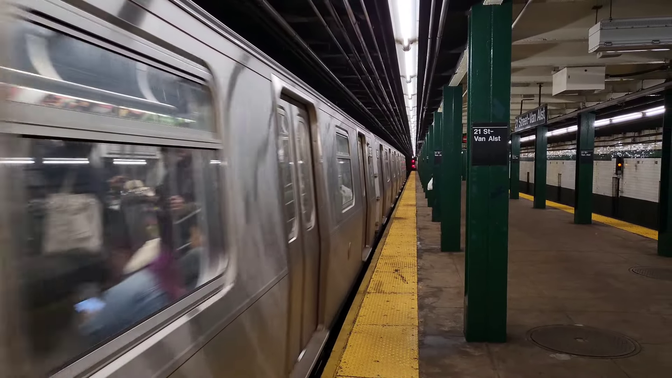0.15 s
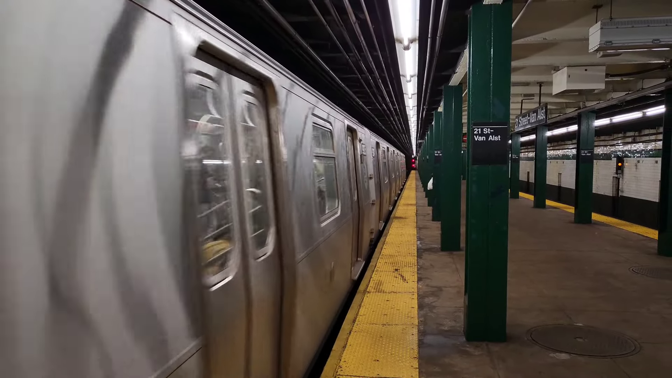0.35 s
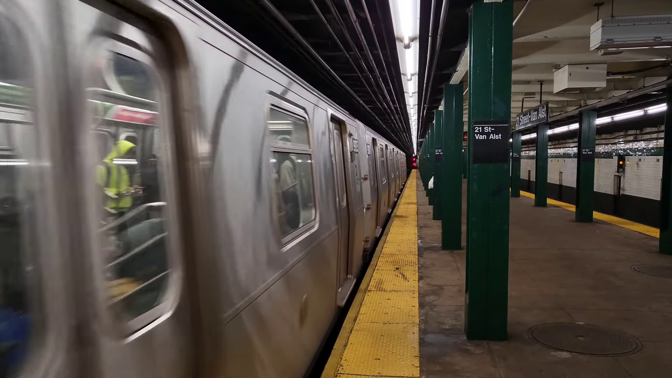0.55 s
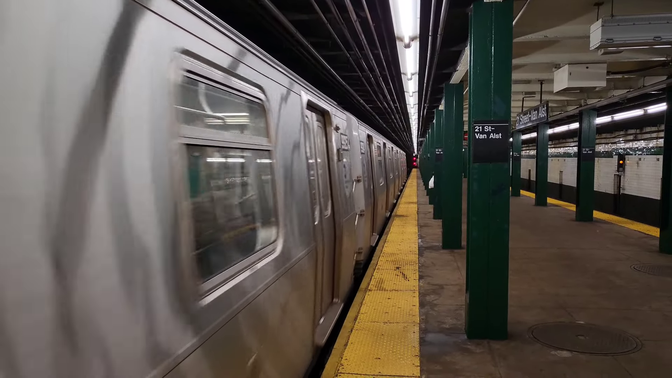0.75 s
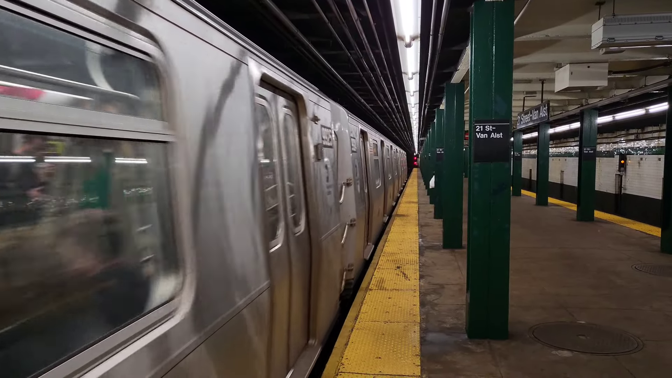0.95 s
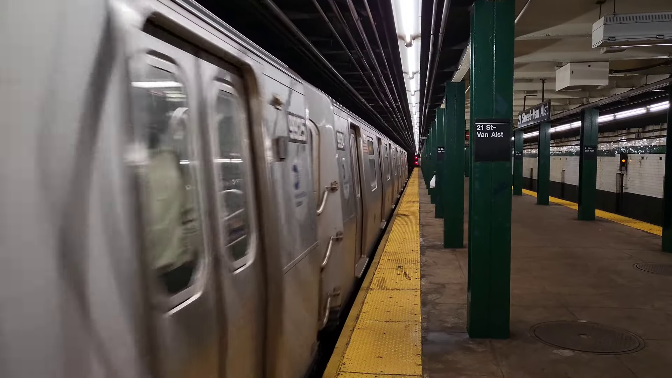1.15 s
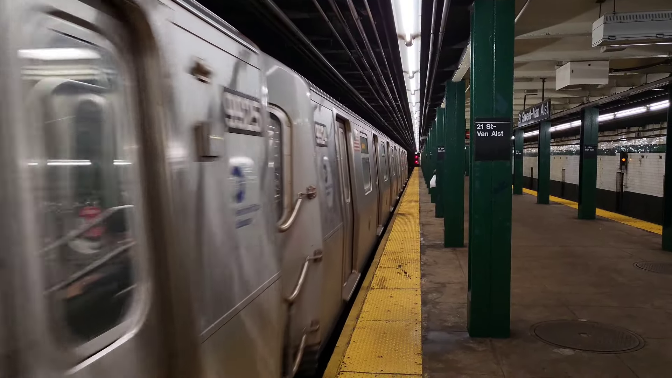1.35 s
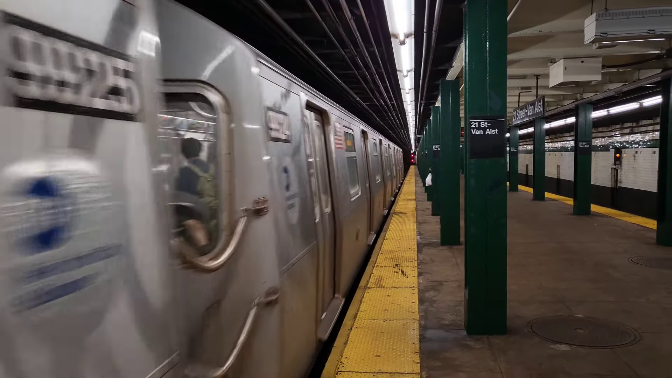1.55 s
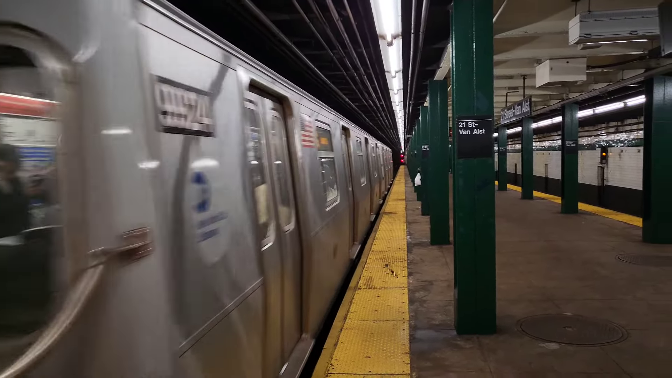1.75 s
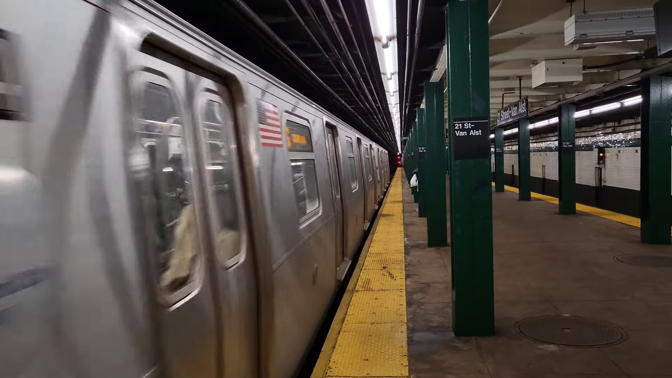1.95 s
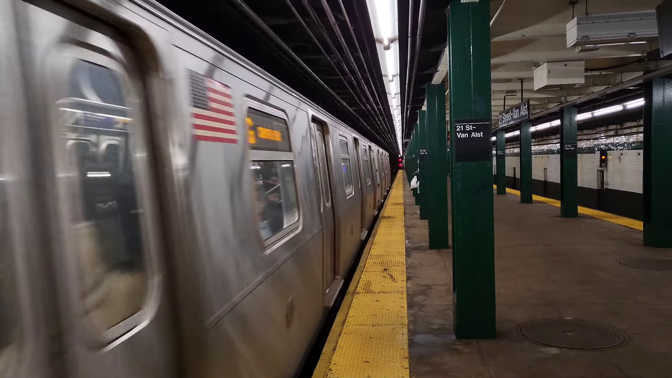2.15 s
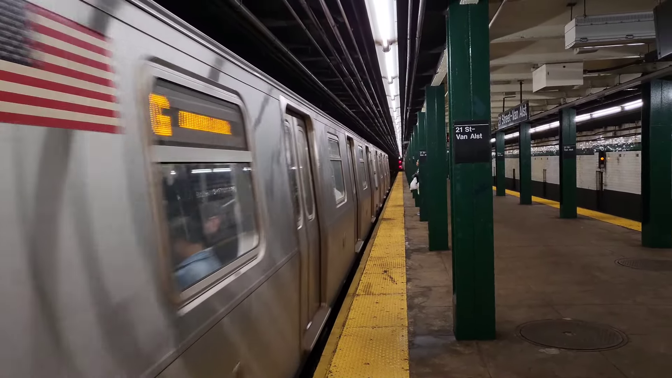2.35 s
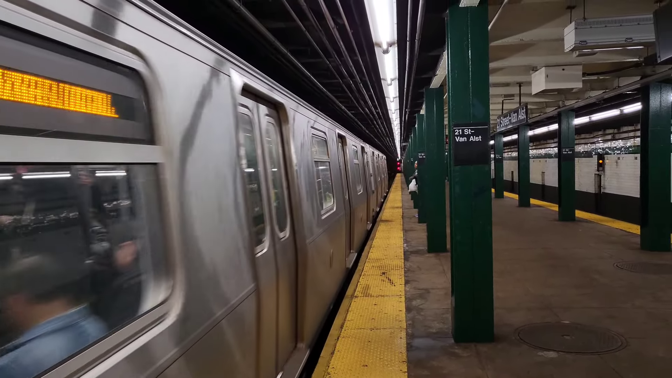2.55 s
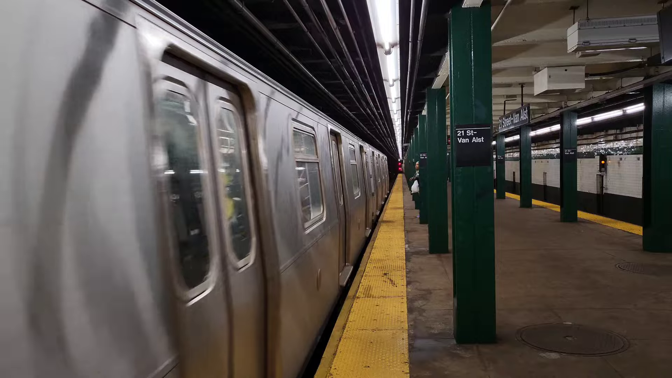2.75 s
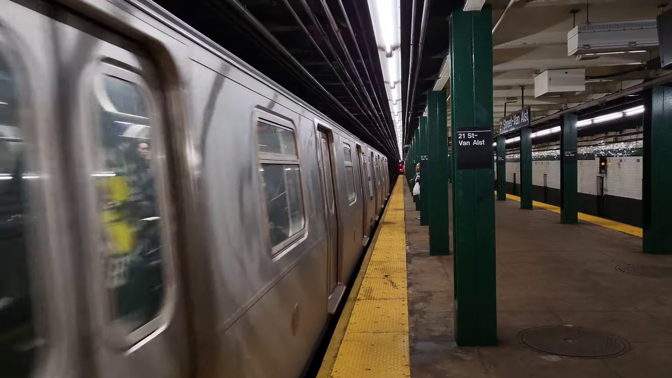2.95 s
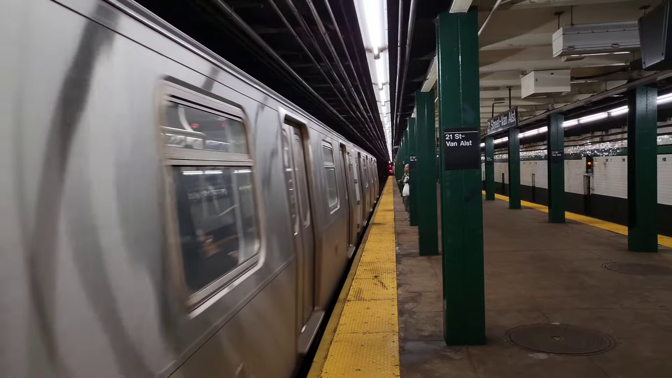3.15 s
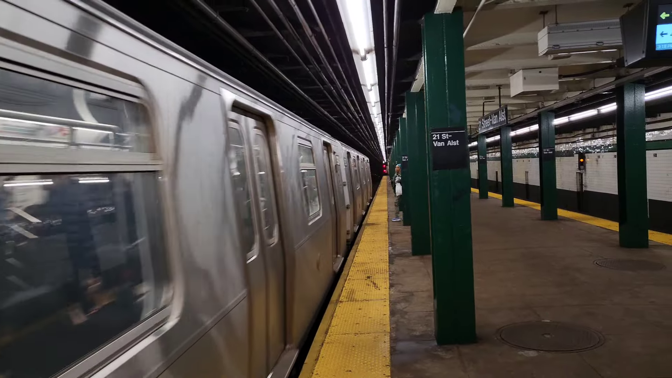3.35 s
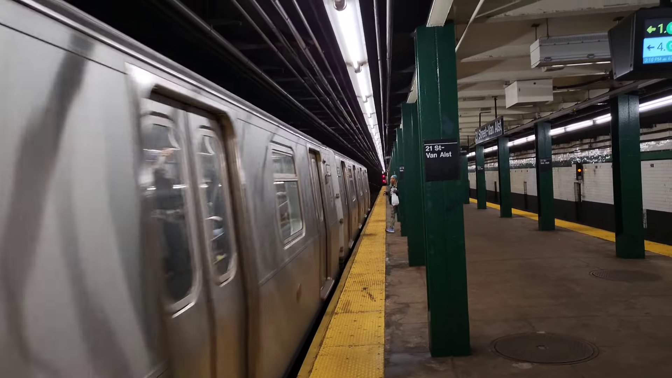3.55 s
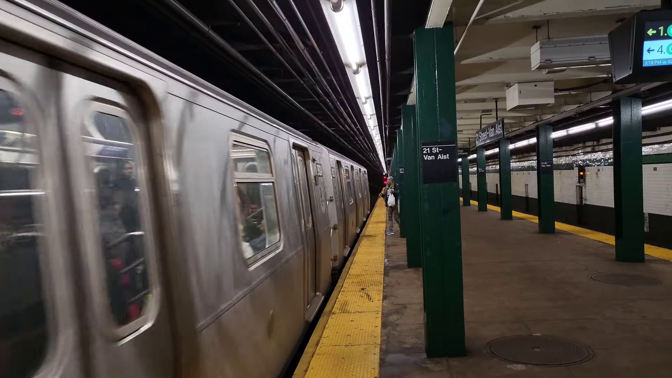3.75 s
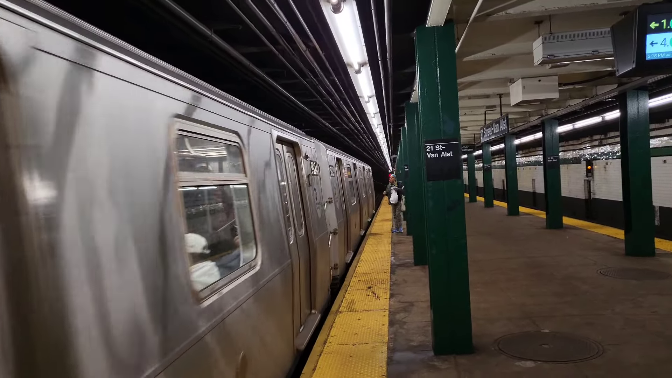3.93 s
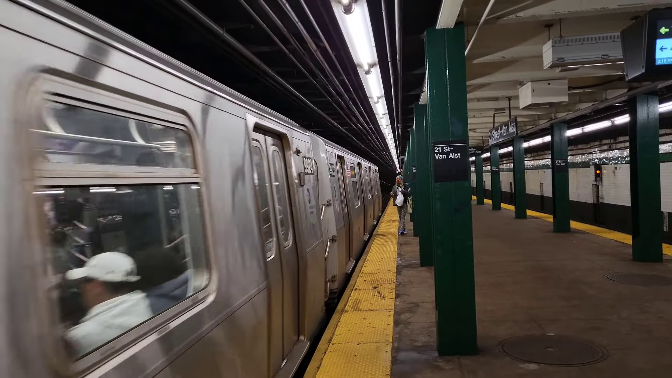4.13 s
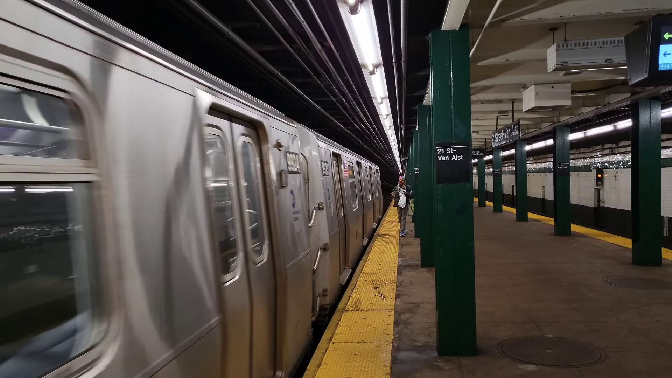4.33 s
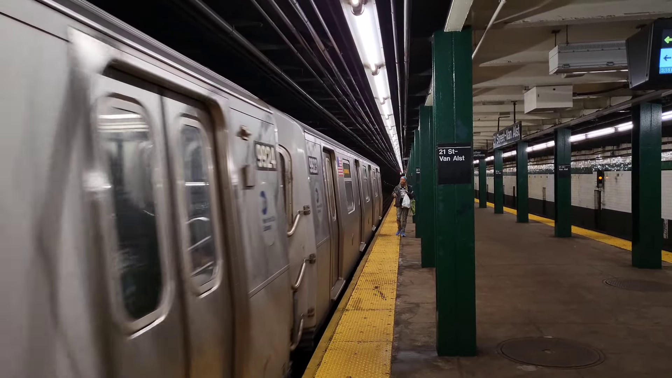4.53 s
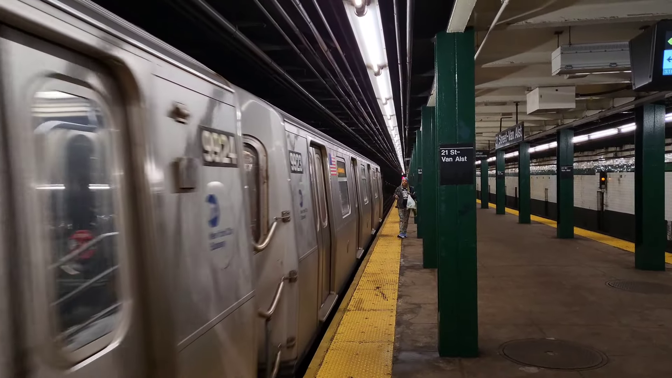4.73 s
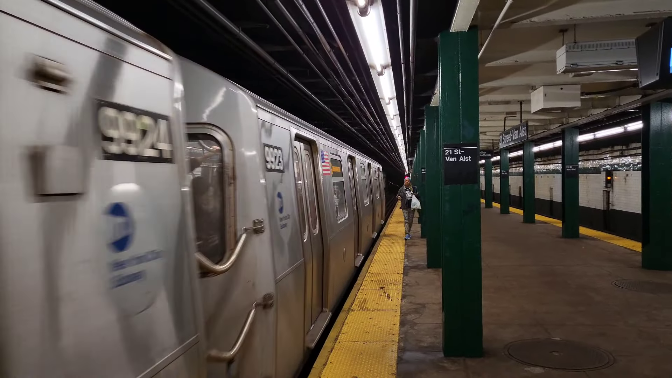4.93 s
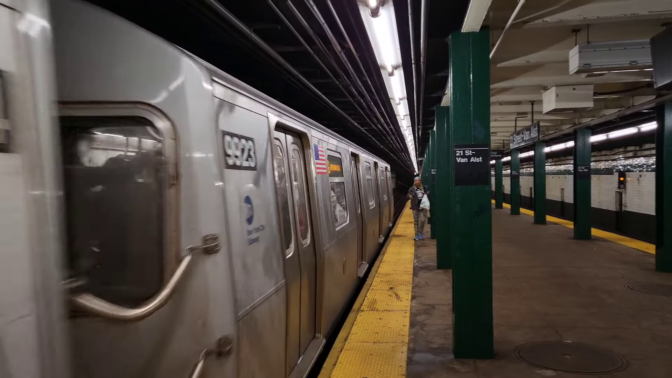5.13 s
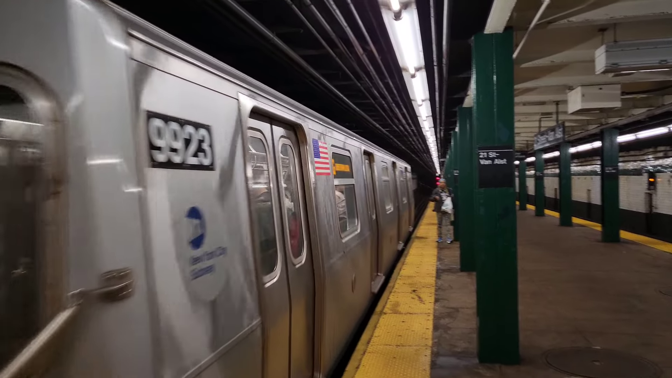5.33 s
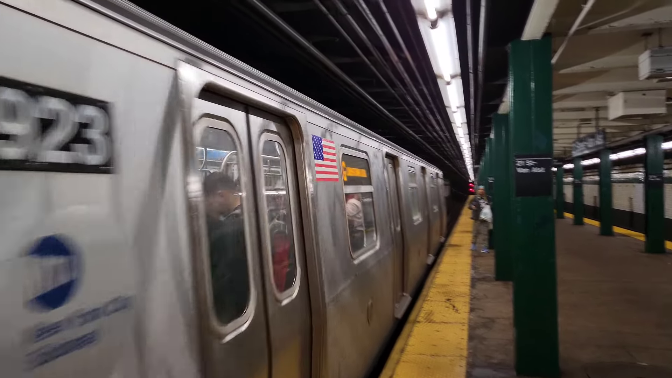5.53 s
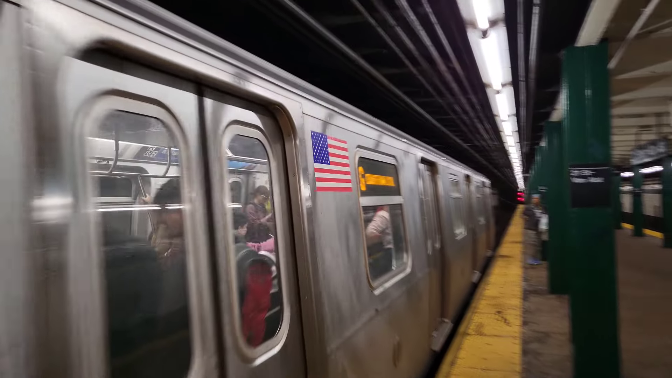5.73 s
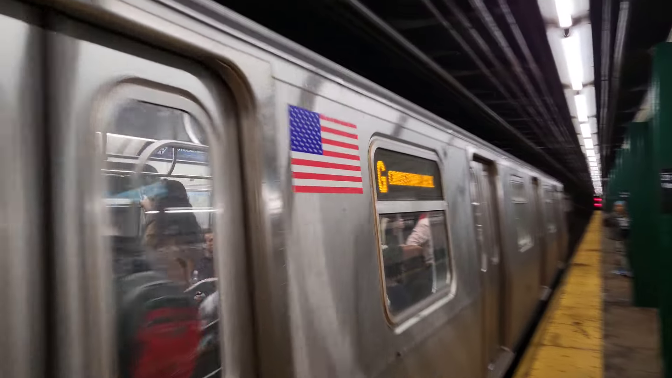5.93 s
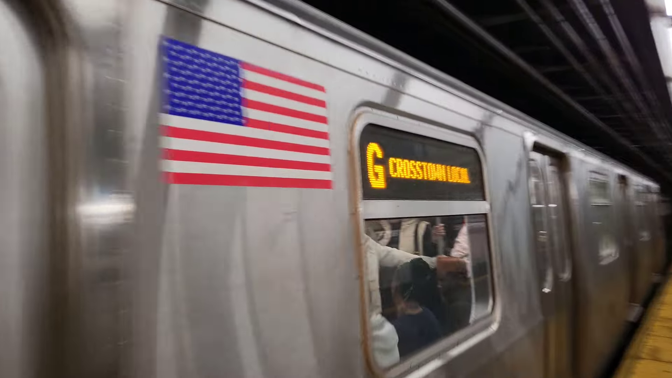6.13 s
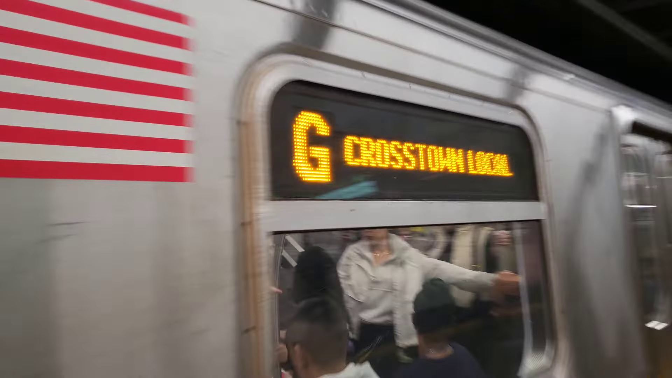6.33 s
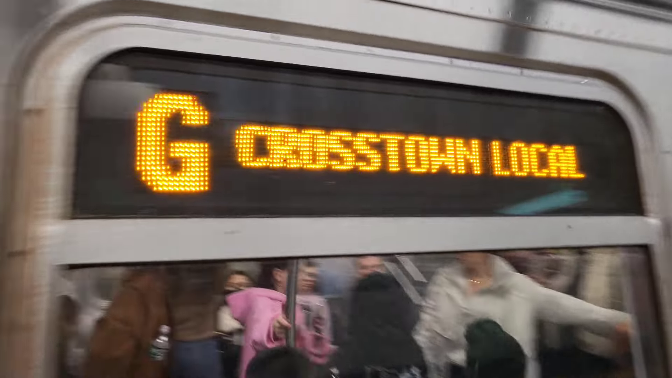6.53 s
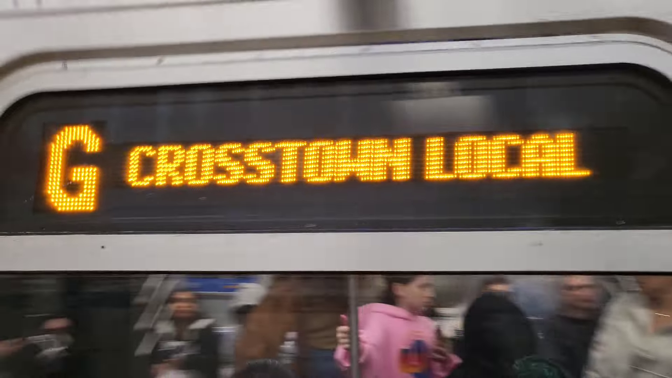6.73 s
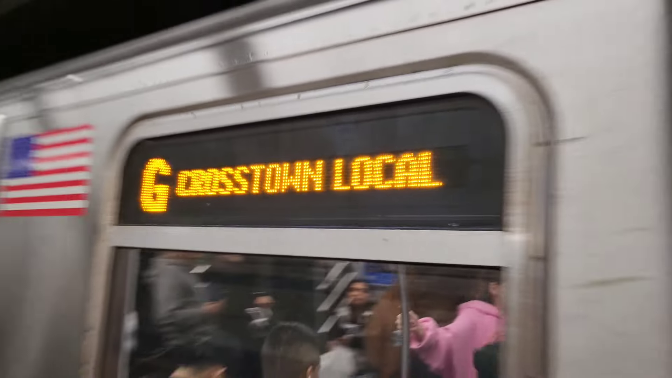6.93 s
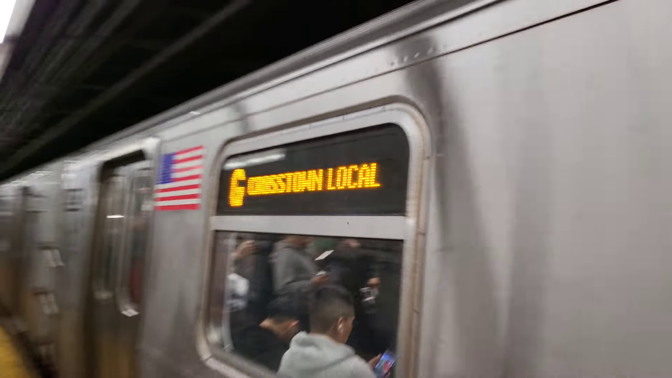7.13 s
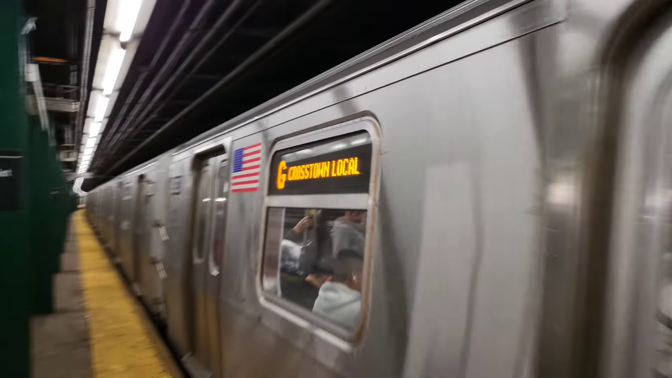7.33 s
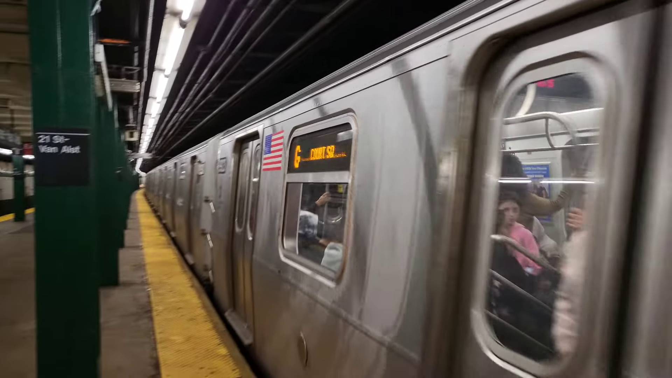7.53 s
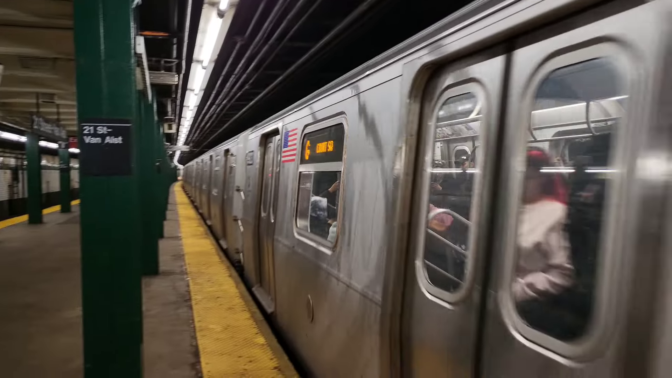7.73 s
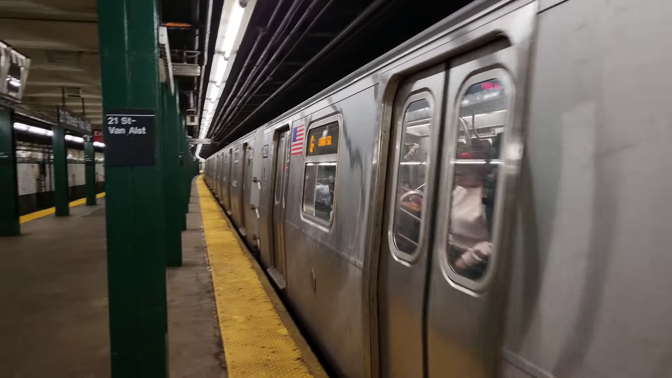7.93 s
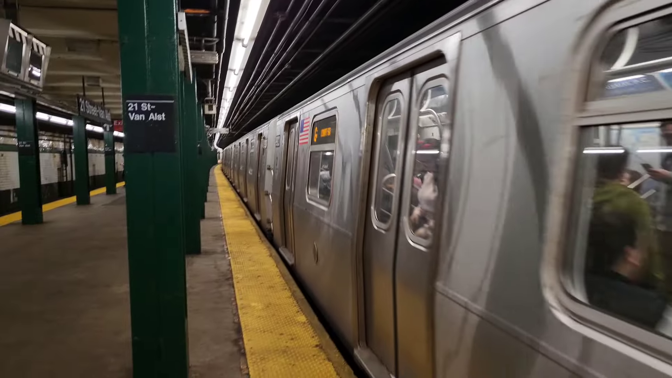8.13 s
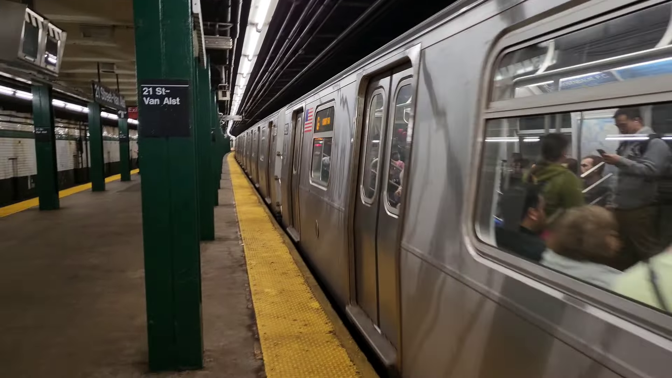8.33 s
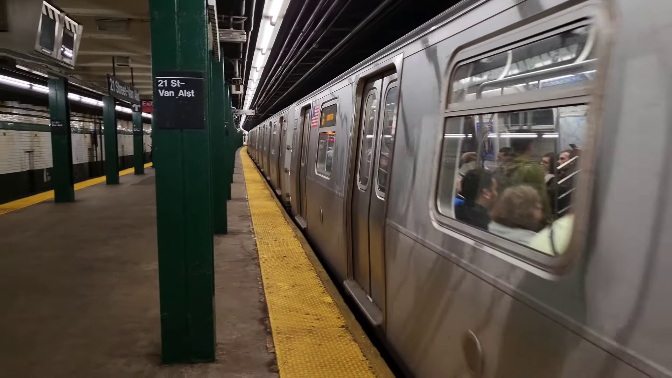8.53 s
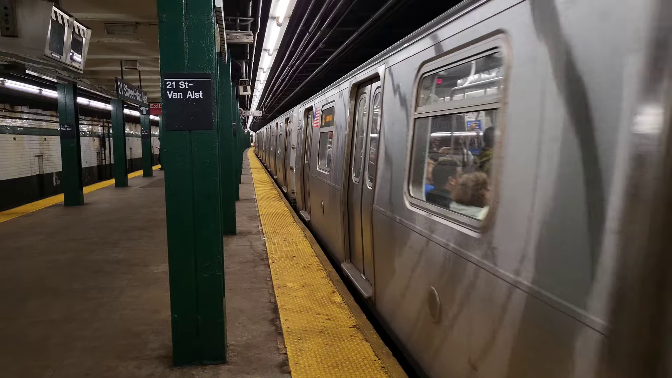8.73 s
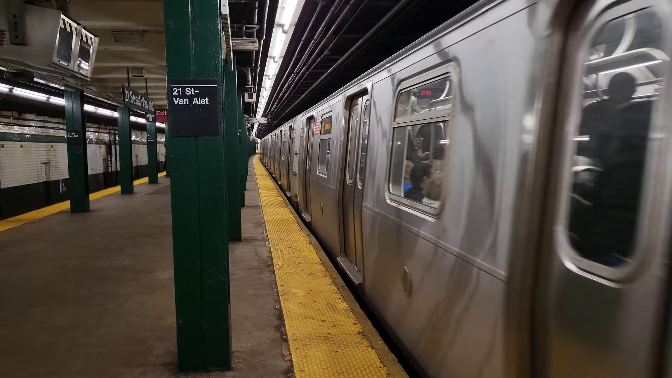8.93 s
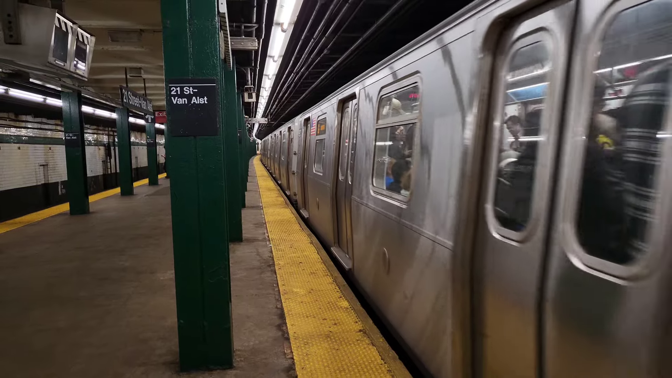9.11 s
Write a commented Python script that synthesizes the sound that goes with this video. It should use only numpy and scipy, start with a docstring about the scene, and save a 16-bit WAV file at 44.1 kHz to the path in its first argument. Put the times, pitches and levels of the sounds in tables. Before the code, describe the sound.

A subway train already rolling close by brakes along an underground platform, heard in wide stereo with hard, diffuse echoes. At 0 s, dense low rumble, midrange roar and thin hiss accompany a reedy, rough motor squeal near 2.5 kHz. At 0.75 s a shriller, stronger squeal near 2.9 kHz takes over, fluttering in quick beads and gaps. Flat wheels thump irregularly about twice a second; knocks stand out near 1.15, 1.9 and 3 s. Wheels swell past around 1.9 s with a short falling groan, booms and singing steel; a tiny high squeak comes at 2.6 s. Around 5 s the squeal drops to about 2.57 kHz, and more wheels pass at 5.4-5.7 s. Then the rumble thins and thumps soften, with weaker bumps around 7.4-8.3 s. At 8.9 s brake shoes bite with gritty rubbing, brightening the squeal; it ends at 9.3 s, still moving.

```python
"""Platform edge of an underground station, a braking subway train an arm's length away, spaced stereo ports.
It opens on rolling rumble, hiss and flat-spot thumps, with a first car's inverter squealing on its dithered
switching rate; a second car takes over at 0.75 s and a third near 5 s, overtones shifting as the train slows.
Bogie pairs swell past near 1.9 and 5.5 s amid knocks, booms, drones and wheel tones; at 8.87 s the brake
shoes bite. Filtered noise makes the wheels, modulated tones the squeal; the hard hall makes it diffuse."""
import sys
import numpy as np
from scipy import signal
from scipy.fft import rfft, irfft, next_fast_len
from scipy.io import wavfile
from scipy.ndimage import uniform_filter1d, map_coordinates

SR = 44100
rng = np.random.default_rng(int(sys.argv[2]) if len(sys.argv) > 2 else 0)


def wrap_up_sound(samples):
    """Save the sound to the file named by the first command line argument, as 16-bit audio."""
    columns = np.atleast_2d(samples).T
    # keep every value between -1 and 1, then stretch to whole-number steps
    tamed = np.clip(columns, -1, 1)
    steps = np.round(tamed * 32767).astype(np.int16)
    wavfile.write(sys.argv[1], SR, steps)


N = 408807
TIME = np.arange(N) / SR


def from_db(db):
    """Decibels to gain."""
    return 10 ** (np.asarray(db) / 20)


def rms_one(x):
    """Scale to rms 1."""
    return x / np.sqrt(np.mean(x ** 2) + 1e-20)


def in_time(rows):
    """Each column of a curve table at every sample."""
    s, *columns = np.transpose(rows)
    return [np.interp(TIME, s, column) for column in columns]


def at_hz(points, hz, outside=None):
    """Read a table on a log-frequency axis."""
    f, value = np.transpose(points)
    return np.interp(np.log(hz), np.log(f), value, outside, outside)


def drift(rate_hz):
    """Smooth chance of spread 1: noise through two equal low-pass poles at the given rate."""
    step = 20   # samples between the drawn points
    pole = np.exp(-2 * np.pi * rate_hz * step / SR)
    noise = rng.standard_normal(N // step + 2002)
    slow = signal.lfilter([1], [1, -2 * pole, pole * pole], noise)[2000:]   # drop the settling
    return np.interp(np.arange(N) / step, np.arange(len(slow)), rms_one(slow))


def bell(middle_s, spread_s):
    """A Gaussian swell of height 1; the spread is its standard deviation."""
    return np.exp(-np.minimum(((TIME - middle_s) / spread_s) ** 2, 100) / 2)


def swelling_tones(rows, waver_hz, waver_rate):
    """One wavering tone for each row, swelling and fading."""
    out = 0
    for middle_s, length_s, pitch_hz, level_db in rows:
        cycles = np.cumsum(pitch_hz + waver_hz * drift(waver_rate)) / SR
        out = out + from_db(level_db) * bell(middle_s, length_s / 2) * np.cos(2 * np.pi * cycles)
    return out


# how alike diffuse sound is at the two spaced ports: frequency_hz, correlation (-1 to 1)
PORT_CORRELATION = [(100, 0.96), (210, 0.96), (300, 0.79), (400, 0.8), (520, 0.61), (750, 0.35),
                    (1050, -0.24), (1600, -0.26), (2300, 0.039), (3000, -0.025)]


def diffuse_noise(colour, flutter_db, flutter_rate):
    """Stereo noise of one colour that arrives from all sides and flutters in level."""
    size = next_fast_len(N, real=True)
    hz = np.maximum(np.fft.rfftfreq(size, 1 / SR), 1)
    white = rfft(rng.standard_normal((2, size)))
    mid, side = white * from_db(at_hz(colour, hz, -np.inf))
    alike = np.clip(at_hz(PORT_CORRELATION, hz), -1, 1)
    ports = np.sqrt(1 + alike) * mid + np.sqrt(1 - alike) * side * [[1], [-1]]
    return rms_one(irfft(ports, size)[:, :N]) * from_db(flutter_db * drift(flutter_rate))


def station(x, t60, near_t60, near_db, count=4):
    """Quick echoes between car side and platform, then the tiled hall; paths change as the car moves."""
    t = TIME[:SR]
    already_ringing = np.concatenate([x[-SR:], x])[None]   # a second of sound before the start
    shares = np.array([drift(4.57) for _ in range(count)])
    shares = shares / np.linalg.norm(shares, axis=0)
    out = 0
    for share in shares:
        near = rms_one(rng.standard_normal((2, SR)) * from_db(-60 * t / near_t60))
        hall = rms_one(rng.standard_normal((2, SR)) * from_db(-60 * t / t60))
        response = from_db(near_db) * near + hall
        path = signal.fftconvolve(already_ringing, response, axes=1)[:, SR:SR + N]
        out = out + share * path / path.std(axis=1, keepdims=True)
    return out


# train speed, as the inverters' modulation depth: time_s, depth (0-1)
SPEED_CURVE = [(0, 0.54), (1.9, .52), (5.3, .41), (9.27, 0.28)]


def modulation_depth():
    """The inverters' modulation depth stands for speed and falls as the train brakes."""
    depth, = in_time(SPEED_CURVE)
    return depth


def speed_db():
    """Speed in dB relative to that of the opening."""
    depth = modulation_depth()
    return 20 * np.log10(depth / depth[0])


def sinking(x, glide):
    """Read a sound ever slower as the train loses speed, so that its pitch sinks."""
    depth = modulation_depth()
    position = np.cumsum((depth / depth[2 * SR]) ** glide)   # normal pace at 2 s
    return np.array([map_coordinates(port, [position], order=1, mode="mirror") for port in x])


# bogies passing the ports, in pairs each side of a coupling: time_s, level_db (relative)
BOGIE_PASSES = [(-.15, 1), (1.83, 2), (2.06, -7), (5.35, -1.5), (5.72, -3)]
PASS_S = 0.12   # half-length of a pass at half power, at the opening speed
HALL_SPREAD, HALL_DB = 6, -7.5   # in the hall a pass is heard this many times longer, and weaker


def bogie_nearness():
    """Power from the bogies falls with the square of distance; a slower pass lasts longer."""
    width = PASS_S / from_db(speed_db())
    power = 0
    for s, db in BOGIE_PASSES:
        distance = (TIME - s) / width
        power = power + from_db(db) ** 2 / (1 + distance ** 2)
        power = power + from_db(db + HALL_DB) ** 2 / (1 + (distance / HALL_SPREAD) ** 2)
    return power


def bite(start_s=8.87, rise_s=0.1):
    """Grip of the brake shoes, 0-1, closing exponentially for the stop."""
    return 1 - np.exp(-np.maximum(TIME - start_s, 0) / rise_s)


def friction(train_db, speed_power, bogie_db, bite_db):
    """Friction gain: the train follows a power of speed, near bogies swell, brake shoes add their share."""
    train = from_db(train_db + speed_power * speed_db())
    bogies = from_db(bogie_db) ** 2 * bogie_nearness()
    brakes = from_db(bite_db) * bite()
    return np.sqrt(train ** 2 + bogies + brakes ** 2)


# wheels on the rail, before surges and trims: time_s, rumble_db, roar_db
ROLLING_LEVELS = [(0, -21.5, -21.5), (.8, -24.5, -21.5), (2.1, -24, -22), (2.9, -24, -23),
                  (3.45, -24, -23.5), (4.4, -23, -22.5), (5.6, -23, -25), (6.8, -27.5, -26.5),
                  (7.9, -26, -26.5), (8.75, -27, -31), (9.27, -29, -27.5)]
# surges as a wheel's flat spot comes round, scaled for shake and grind: time_s, rumble_surge_db, roar_surge_db
FLAT_SPOT_TURNS = [(.33, 2, 1), (.75, 2.5, 1.5), (1.12, -1.5, 2.5), (1.25, 4.5, 1.5), (1.629, 5, 1.5),
                   (2.07, 1.5, 4.5), (2.56, 4.5, 5.5), (3.02, 3, 3), (3.53, 0.5, 1), (4.03, 2, 0),
                   (4.58, 1, -1), (5.22, -0.5, 1.5), (5.57, 1.5, 0.5), (7.5, 2, 2), (8.0, -1, 4),
                   (8.23, 2.5, 0.5)]
# noise colours from low to high, relative levels: frequency_hz, level_db (per Hz)
SHAKE_COLOUR = [(15, -36), (24, -6), (34, 0.5), (58, 7), (80, 0.5), (102, 5), (135, -41)]
RUMBLE_COLOUR = [(98, -35), (112, -5), (126, 2), (150, 1), (185, 0), (222, -2), (290, -17.5)]
ROAR_COLOUR = [(185, -28), (240, 1), (266, 2.3), (305, -1.5), (375, 1), (425, -2), (490, -3), (600, -9),
               (720, -13), (1050, -22.5)]
GRIND_COLOUR = [(480, -1), (690, -0.5), (820, -2.5), (1000, -4.5), (1400, -7.5), (2000, -13), (2600, -21),
                (3400, -24.5)]
RUB_COLOUR = [(2000, 2), (2800, 7), (3300, 1.5), (3500, 3.5), (4600, 3), (5300, -2), (6100, -6), (7400, -4),
              (9500, -14.5)]
HISS_COLOUR = [(4500, 10), (7200, -4), (9000, 3), (10800, 4), (12500, 1.5), (15700, -1.5)]


def wheels():
    """Rough wheels shake ground and car bodies; grinding and hiss swell as each bogie goes by."""
    rumble_db, roar_db = in_time(ROLLING_LEVELS)
    surge_db, roar_surge_db = sum(np.outer(dbs, bell(s, 0.048)) for s, *dbs in FLAT_SPOT_TURNS)
    shake = from_db(-35.0 + 0.63 * surge_db) * diffuse_noise(SHAKE_COLOUR, flutter_db=1.5, flutter_rate=22)
    rumble_gain = from_db(rumble_db - 0.34 + surge_db)
    rumble = rumble_gain * diffuse_noise(RUMBLE_COLOUR, flutter_db=0.0, flutter_rate=22)
    roar_noise = diffuse_noise(ROAR_COLOUR, flutter_db=1.3, flutter_rate=20)
    roar = from_db(roar_db - 1.0 + roar_surge_db) * sinking(roar_noise, glide=0.17)
    grind = friction(train_db=-32.5, speed_power=1.24, bogie_db=-40.5, bite_db=-39.5)
    grind = grind * from_db(0.55 * roar_surge_db)
    rub = friction(train_db=-45.5, speed_power=0.45, bogie_db=-40.5, bite_db=-45)
    hiss = friction(train_db=-58.0, speed_power=-0.05, bogie_db=-53.0, bite_db=-56)
    return (shake + rumble + roar
            + grind * diffuse_noise(GRIND_COLOUR, flutter_db=1.5, flutter_rate=43)
            + rub * diffuse_noise(RUB_COLOUR, flutter_db=1.5, flutter_rate=27)
            + hiss * diffuse_noise(HISS_COLOUR, flutter_db=0.3, flutter_rate=29))


# hollow resonances set droning by the rolling: middle_s, length_s, pitch_hz, level_db (before flutter)
DRONE_TONES = [(.65, 0.51, 288, -27.5), (.95, 0.22, 378, -27), (1.73, 0.077, 263, -19),
               (2.05, 0.25, 263, -22.5), (2.95, .16, 263, -25.5), (2.93, 0.46, 177, -24),
               (4.5, 0.86, 231, -25), (6.16, .2, 414, -28), (7.55, 0.27, 360, -31)]


def drones(flutter_db=2.0):
    """Low resonances stand out of the rumble, alike at both ports."""
    return swelling_tones(DRONE_TONES, waver_hz=4.01, waver_rate=11.9) * from_db(flutter_db * drift(3.5))


# car bodies and track booming after jolts: start_s, pitch_hz, level_db (peak of the envelope)
JOLT_BOOMS = [(1.225, 126.4, -20), (1.574, 500, -22.5), (1.601, 338, -21), (2.006, 139.6, -15.5),
              (2.52, 368, -20.5), (2.545, 130.3, -16), (3.05, 392, -20), (3.925, 387, -27),
              (4.455, 378, -25.5), (3.495, 130, -19), (4.544, 186.7, -15), (5.186, 161, -22),
              (5.521, 134.4, -17), (7.429, 500, -29.5), (7.875, 178, -22.5), (8.207, 158, -30),
              (8.325, 314.5, -25.5)]


def booms(waver_hz=4, rise_s=0.021, t60=0.34):
    """Each jolt builds up one low resonance, which rings off."""
    waver, out = waver_hz * drift(12), np.zeros(N + SR)
    age = TIME[:SR // 2]
    shape = (1 - np.exp(-(age / rise_s) ** 2)) * from_db(-60 * age / t60)
    shape = shape / shape.max()
    for (s, hz, db), turn in zip(JOLT_BOOMS, rng.random(len(JOLT_BOOMS))):
        span = int(s * SR) + np.arange(len(age))
        cycles = turn + np.cumsum(hz + waver[span % N]) / SR   # random starting phase
        out[span] += from_db(db) * shape * np.cos(2 * np.pi * cycles)
    return out[:N]


def groan(at_s=1.6, spread_s=0.1, pitch_hz=465, sag_hz_per_s=330, level_db=-27, waver_hz=8):
    """One short groan, a swelling tone that falls in pitch."""
    pitch = pitch_hz - sag_hz_per_s * (TIME - at_s) + waver_hz * drift(21)
    return from_db(level_db) * bell(at_s, spread_s) * np.cos(2 * np.pi * np.cumsum(pitch) / SR)


# wheels knocking on the rail: start_s, level_db (before rise and decay)
RAIL_KNOCKS = [(1.15, -28), (1.61, -34), (1.86, -24), (2.03, -45), (2.55, -46), (3.01, -26), (3.77, -40),
               (7.35, -37)]
# colour of a knock, relative: frequency_hz, level_db (per Hz)
KNOCK_COLOUR = [(150, -10), (300, -14), (510, -9), (700, 20), (1200, 4), (2100, 5), (4000, -56),
                (9000, -55)]


def knocks(rise_s=0.0076, t60=0.35):
    """A wheel slaps the rail and the blow rolls on through the hall as decaying diffuse noise."""
    force = 0
    for s, db in RAIL_KNOCKS:
        age = np.maximum(TIME - s, 0)
        force = force + from_db(db - 60 * age / t60) * (1 - np.exp(-age / rise_s))
    return force * diffuse_noise(KNOCK_COLOUR, flutter_db=3.5, flutter_rate=66)


# wheels that sing for a moment: middle_s, length_s, pitch_hz, level_db (before the echo is mixed in)
WHEEL_SONGS = [(1.09, .25, 1055, -42), (1.5, 0.3, 1525, -43), (2.05, 0.16, 780, -30.5),
               (2.54, 0.075, 839, -32), (3.04, 0.04, 538, -21), (3.04, .07, 645, -35),
               (3.03, .06, 882, -42), (3.94, 0.07, 619, -28), (5.1, 0.82, 682, -36.5),
               (6.08, 0.15, 1220, -44)]


def singing_wheels():
    """A rubbing flange sets one wheel mode swelling and fading, with its echo from the hall."""
    direct = swelling_tones(WHEEL_SONGS, waver_hz=14.24, waver_rate=38.6)
    echo = station(direct, t60=0.63, near_t60=0.17, near_db=10, count=1)
    return direct.std() * rms_one(direct / direct.std() + 0.31 * echo)


def chirp(at_s=2.627, pitch_hz=13850, level_db=-46, rise_s=0.001, t60=0.045):
    """One tiny, very high squeak of steel, a wavering tone that dies at once."""
    age = np.maximum(TIME - at_s, 0)
    pulse = from_db(level_db - 60 * age / t60) * (1 - np.exp(-age / rise_s))
    return pulse * np.cos(2 * np.pi * np.cumsum(pitch_hz + 130 * drift(200)) / SR)


def pulse_width_gain(multiple, depth, fill=0.097):
    """Overtones of pulse-width modulation wax and wane with its depth as Bessel functions."""
    angle = np.linspace(0, np.pi, 32)
    depths = np.linspace(0, 1, 100)
    order = 1 + multiple % 2
    swing = np.outer(multiple * np.pi / 2 * depths, np.sin(angle))
    bessel = np.cos(order * angle - swing).mean(axis=1)   # Bessel's integral
    return np.interp(depth, depths, np.hypot(bessel, fill))   # fill keeps the nulls from silence


def evened(x, share=0.88, smooth_s=0.036):
    """Steady the level on each side, which leaves a firmer tone."""
    power = uniform_filter1d(rms_one(x) ** 2, max(int(smooth_s * SR), 1), axis=1) + 0.1
    return rms_one(x / power ** (np.clip(share, 0, 1) / 2))


def brief_swings(rows, spread_s):
    """Sum of bells in dB, one of each row's height at each row's time."""
    s, db = np.transpose(rows)
    coarse = TIME[::40]
    offset = (coarse[:, None] - s) / spread_s
    swings = np.exp(-np.minimum(offset ** 2, 100) / 2) @ db
    return np.interp(TIME, coarse, swings)


# brief flares of the squeal's main line: time_s, swing_db (overlapping rows add)
SQUEAL_FLARES = [(.017, 6), (.33, 4), (.47, 3), (.587, 1.5), (.9, 1), (1.63, 5.5), (1.76, -2), (2.57, 1),
                 (2.631, 8), (2.872, 7.5), (2.973, 7), (3.375, 5), (3.498, -1), (3.971, 2.5), (4.04, 6),
                 (4.243, 1), (4.365, 3.5), (4.412, 5.5), (4.793, 1), (5.779, 3.5), (6.4, -2), (6.524, 3),
                 (6.583, 3.5), (7.181, 3.5), (7.559, 4), (7.728, 4.5), (7.877, 3), (8.014, 6), (8.139, 11),
                 (8.312, 3), (8.738, 1), (8.956, 4), (9.118, 5.5)]
# brief gaps in it: time_s, swing_db (overlapping rows add)
SQUEAL_GAPS = [(.04, -3), (.135, -3), (.41, -4), (.499, -4), (.675, 0), (1.854, -5), (2.18, -2),
               (2.462, -2), (2.747, 0.5), (2.831, -2), (3.464, -9), (3.815, -2.5), (4.512, -4), (5.103, -5),
               (6.161, -5), (6.647, -3), (7.503, 2), (7.6, -6), (7.676, -3), (7.829, -1), (8.061, -9),
               (8.167, -12), (8.233, -5), (8.408, 0), (9.022, 1)]


def beaded(x, above_hz, bead_db, bead_rate, overtone_flutter_db=2.06, bite_lift_db=4):
    """The main line breaks into beads, flares and gaps; overtones flutter apart and brighten at the bite."""
    main = signal.sosfiltfilt(signal.butter(8, above_hz, fs=SR, output="sos"), x)
    flutter = rms_one(from_db(overtone_flutter_db * drift(67)))
    overtones = (x - main) * flutter * from_db(bite_lift_db * bite())
    band = signal.butter(2, [bead_rate / 2, bead_rate * 2], "band", fs=SR, output="sos")
    quick = signal.sosfilt(band, rng.standard_normal(N))
    beads = rms_one(from_db(bead_db * rms_one(np.tanh(rms_one(quick)))))
    swings_db = brief_swings(SQUEAL_FLARES, spread_s=0.016) + brief_swings(SQUEAL_GAPS, spread_s=0.018)
    return evened(main) * main.std() * beads * from_db(swings_db) + overtones


def inverter(casing, switch_hz, dither_hz, dither_limit, split_hz, widening, slot_db, upper_slot_db,
             overtone_db, bead_db, bead_rate, odd_split=1.9, slot_span_hz=1420):
    """A motor sings at multiples of its switching rate; limited random dither smears lines into harsh bands."""
    depth = modulation_depth()
    dither = 2 * np.pi * np.cumsum(dither_hz * rms_one(np.tanh(drift(73.6) / dither_limit))) / SR
    drive = 2 * np.pi * np.cumsum(split_hz * (1 + 0.2 * drift(8.25))) / SR
    slots = np.cos(2 * np.pi * np.cumsum(slot_span_hz * depth) / SR)   # rotor-slot side tones close in
    tone = 0
    for multiple, db in casing:
        k = round(multiple)
        phase = 2 * np.pi * k * switch_hz * TIME + dither * (k / 2) ** widening
        # the drive current splits each line in two, odd ones wider
        beat = np.sqrt(2) * np.cos(odd_split ** (k % 2) * drive)
        sides = beat + from_db(upper_slot_db if k > 2 else slot_db) * slots
        level = from_db(db + overtone_db * (k > 2)) * pulse_width_gain(k, depth)
        tone = tone + level * np.cos(phase) * sides
    tone = tone / pulse_width_gain(1.4, depth)   # offsets the level change with depth
    heard = rms_one(station(tone, t60=1.68, near_t60=0.069, near_db=-3.5))
    return beaded(heard, 2.88 * switch_hz, bead_db, bead_rate)


def squeal_envelope(turn, db, build_s, lift_db, switch_s, fade_db_per_s=20, direct_share=0.37):
    """A squeal swells in, lifts while bogies are near and lets go; its echo builds and dies in the hall."""
    on, off = turn
    since_on, since_off = np.maximum(TIME - on, 0), np.maximum(TIME - off, 0)
    direct = (1 - np.exp(-since_on / switch_s)) * np.exp(-since_off / switch_s)
    echo = (1 - np.exp(-since_on / build_s)) * from_db(-fade_db_per_s * since_off)
    share = np.clip(direct_share, 0, 1)
    lift = lift_db * np.sqrt(bogie_nearness())
    return (share * direct + (1 - share) * echo) * from_db(db + lift)


# each car's squeal in turn: on_s, off_s
CAR_TURNS = [(-1, .76), (.745, 5.27), (4.965, 10)]
# how the motor casings radiate, before overtone trims: multiple (of the switching rate), level_db (relative)
REEDY_CASING = [(2, 3.5), (3, -6), (4, -12), (5, -24), (6, -15), (7, -27.5), (8, -16.5), (10, -33),
                (11, -32), (12, -30)]
SHRILL_CASING = [(2, 7), (3, -17.5), (4, -18), (5, -32), (6, -13), (8, -30), (10, -34.5)]


def squeal():
    """Three cars squeal in turn, each inverter switching at its own rate."""
    first = inverter(REEDY_CASING, switch_hz=1238, dither_hz=35.55, dither_limit=1.23, split_hz=52,
                     widening=0.71, slot_db=-12.5, upper_slot_db=-9, overtone_db=-0.5,
                     bead_db=3.0, bead_rate=19.4)
    second = inverter(SHRILL_CASING, switch_hz=1431.0, dither_hz=44.07, dither_limit=2.7, split_hz=27,
                      widening=0.75, slot_db=-20.5, upper_slot_db=-13, overtone_db=2.5,
                      bead_db=2.06, bead_rate=24)
    third = inverter(REEDY_CASING, switch_hz=1283.3, dither_hz=21.08, dither_limit=2.08, split_hz=35,
                     widening=1.1, slot_db=-15.5, upper_slot_db=-17, overtone_db=-1,
                     bead_db=2.2, bead_rate=16.7)
    first_gain = squeal_envelope(CAR_TURNS[0], db=-34.0, build_s=0.1, lift_db=5.5, switch_s=0.12,
                                 fade_db_per_s=16)
    second_gain = squeal_envelope(CAR_TURNS[1], db=-30.5, build_s=0.21, lift_db=5.5, switch_s=0.019,
                                  fade_db_per_s=29)
    third_gain = squeal_envelope(CAR_TURNS[2], db=-34.0, build_s=0.51, lift_db=6.5, switch_s=0.019)
    return first * first_gain + second * second_gain + third * third_gain


def scene():
    """The train at the platform edge, from the rolling bed up to the squeal."""
    return wheels() + drones() + booms() + groan() + knocks() + singing_wheels() + chirp() + squeal()


def record(dry):
    """The top is cut steeply above 15.78 kHz at both ports."""
    return signal.sosfilt(signal.ellip(12, 0.1, 80, 15780, fs=SR, output="sos"), dry)


dry = scene()
out = record(dry)
wrap_up_sound(out)
```